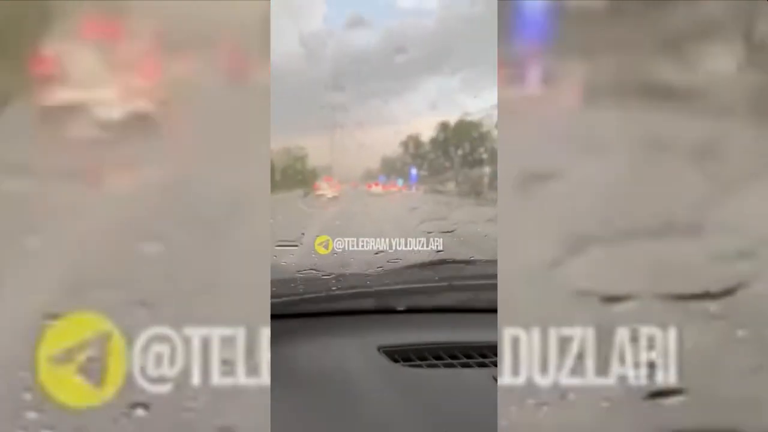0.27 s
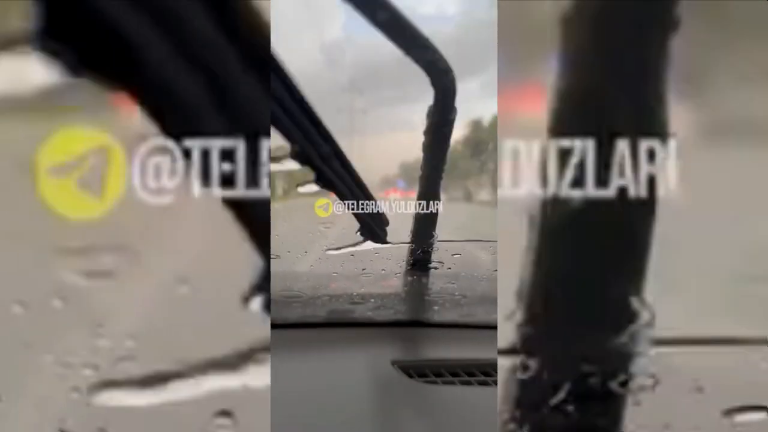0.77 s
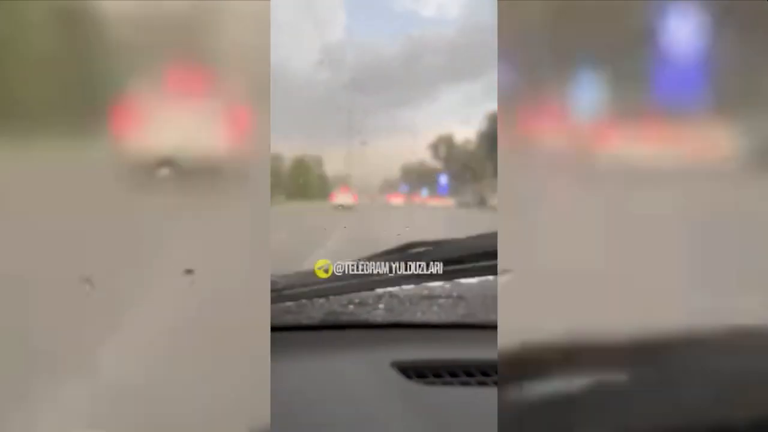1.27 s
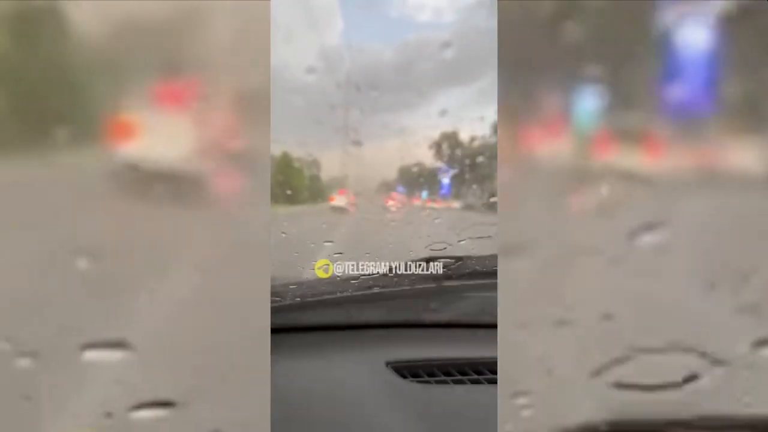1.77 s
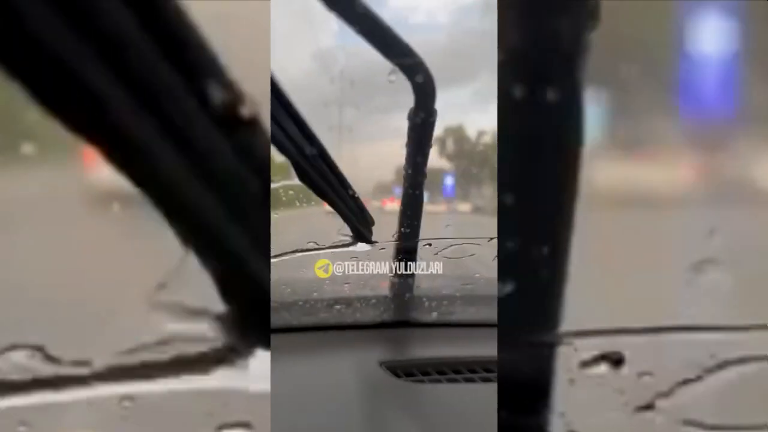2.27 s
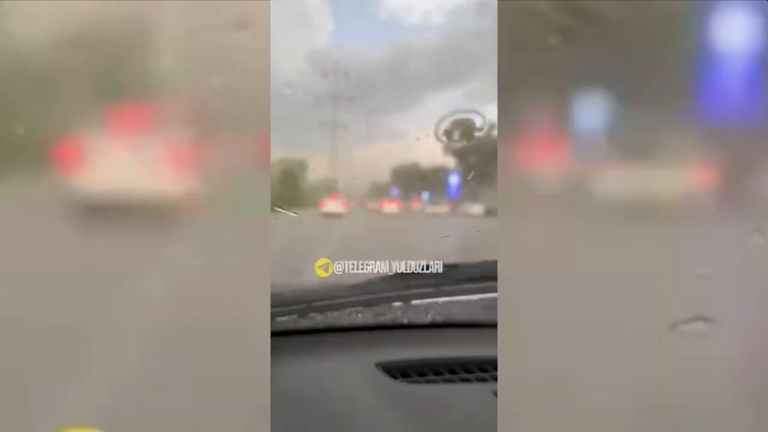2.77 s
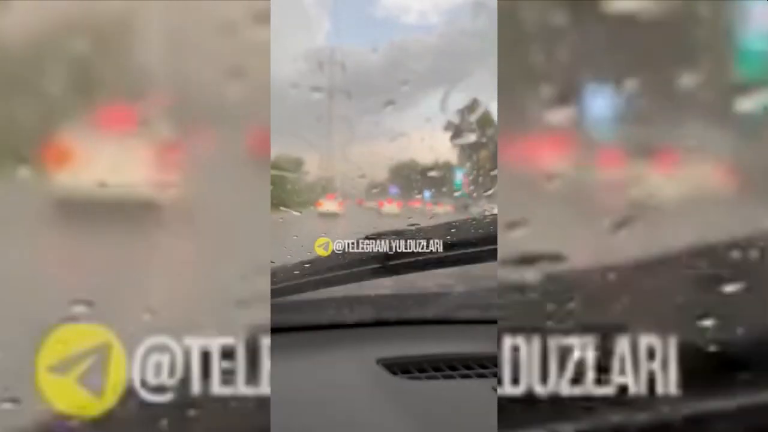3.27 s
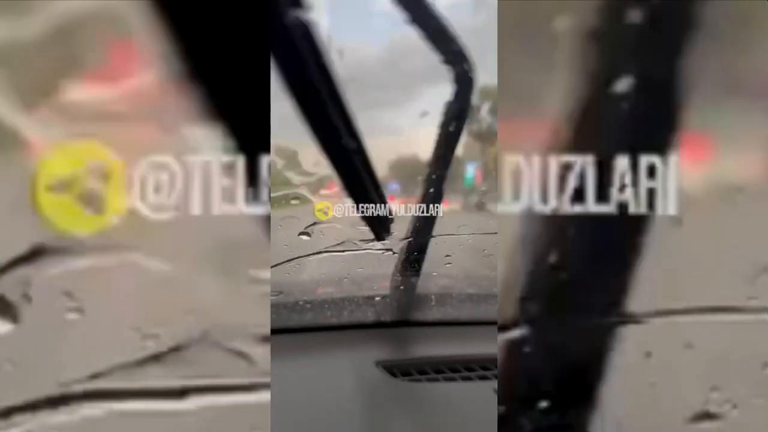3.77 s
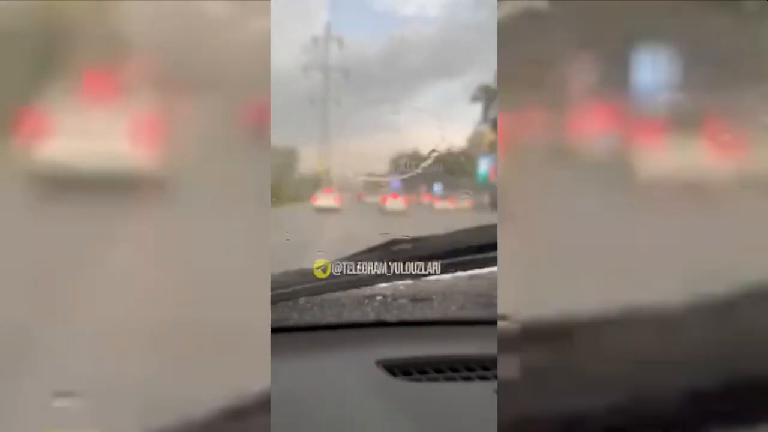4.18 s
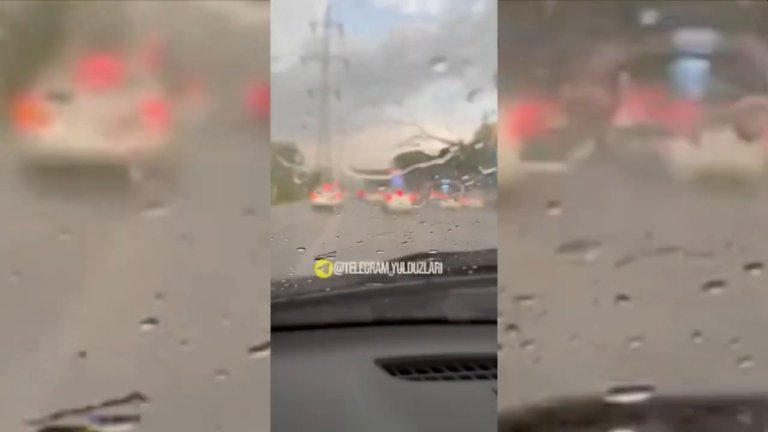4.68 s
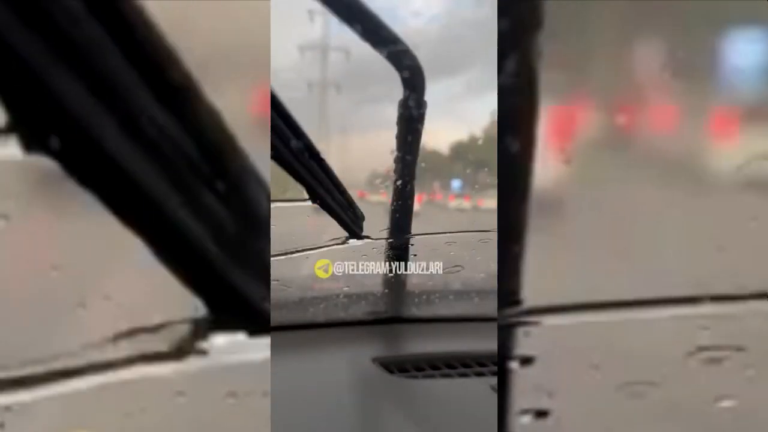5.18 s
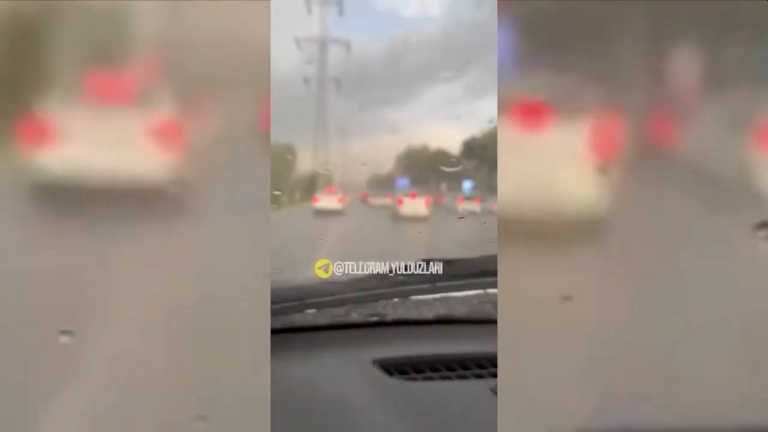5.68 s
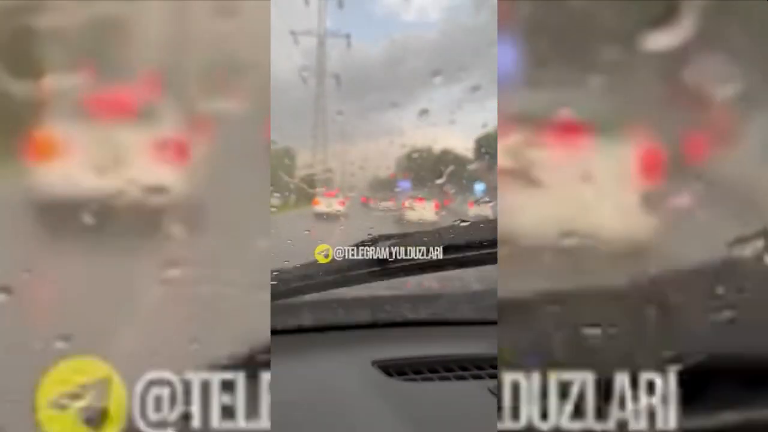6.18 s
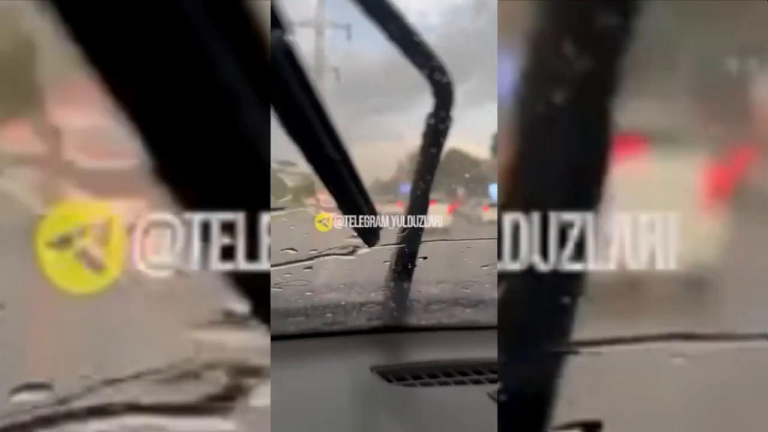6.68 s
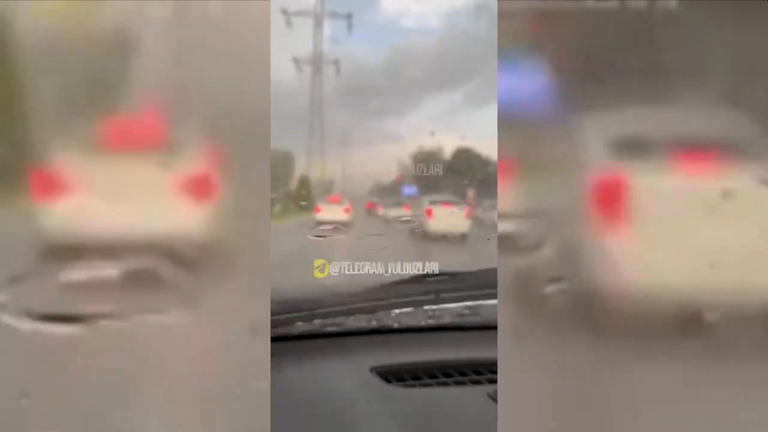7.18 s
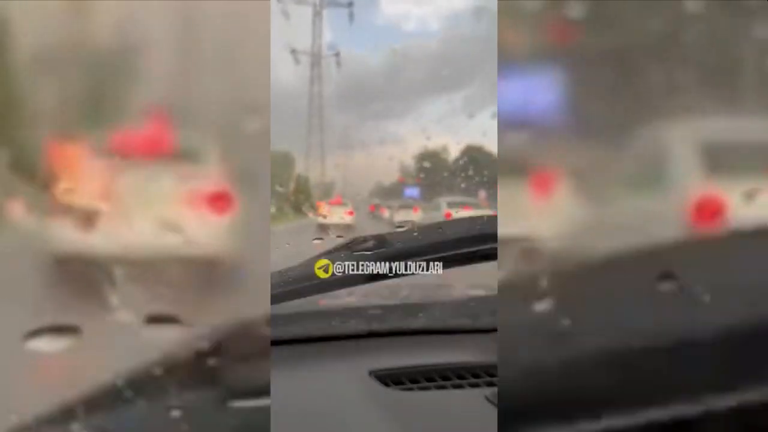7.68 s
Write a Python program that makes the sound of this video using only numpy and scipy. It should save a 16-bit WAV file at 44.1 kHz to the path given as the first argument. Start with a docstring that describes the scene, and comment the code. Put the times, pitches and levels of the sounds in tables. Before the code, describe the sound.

Inside a moving car in a downpour: dense pattering hiss, sharp drop cracks, low tyre rumble, bassy bumps and a wiper thud every second and a half.

```python
"""Inside a moving car in heavy rain, heard from the front seat.
Drops excite short bursts of damped modes: cracks on the windscreen, drumming through the roof lining, fine spray.
All come in flurries that slowly ease off. Wipers strike low modes of the bodywork and fling water aside.
Below, filtered noise makes the tyre rumble and body shake, and a wavering sine is the cabin air booming on bumps."""
import sys
import numpy as np
from scipy import signal
from scipy.fft import rfft, irfft, next_fast_len
from scipy.io import wavfile
from scipy.ndimage import uniform_filter1d

SR = 44100
rng = np.random.default_rng(int(sys.argv[2]) if len(sys.argv) > 2 else 0)


def dump_mix(stems):
    """Bounce the given channels to the path in sys.argv[1] as a 16-bit WAV at rate SR."""
    frames = np.atleast_2d(stems).T  # one column per channel
    limited = np.clip(frames, -1, 1)  # hard clip at full scale
    pcm = np.round(limited * 32767).astype(np.int16)
    wavfile.write(sys.argv[1], SR, pcm)


N = 349713
TIME = np.arange(N) / SR


def from_db(db):
    """Level and amplitude: 20 dB is a factor of ten."""
    return 10 ** (np.asarray(db) / 20)


def rms_one(x):
    """Normalisation: scale to unit rms."""
    return x / np.sqrt(np.mean(x ** 2) + 1e-20)


def steady(x, span_s):
    """Automatic gain: hold the running rms near one, leaving faster detail alone."""
    size = max(int(span_s * SR), 8)
    power = uniform_filter1d(uniform_filter1d(x ** 2, size), size)
    return x / np.sqrt(power + 1e-12)


def coloured(x, response):
    """Minimum-phase filtering: folding the cepstrum makes a given magnitude response causal."""
    size = 2 * next_fast_len(len(x) // 2 + 4096)
    hz, db = np.transpose(response)
    bins = np.maximum(np.arange(size // 2 + 1) * SR / size, 1)
    gain = from_db(np.interp(np.log(bins), np.log(hz), db))
    cepstrum = irfft(np.log(gain))
    cepstrum[1:size // 2] *= 2
    cepstrum[size // 2 + 1:] = 0
    return irfft(rfft(x, size) * np.exp(rfft(cepstrum)))[:len(x)]


def tinted(x, colour_db):
    """Modal individuality: give one spot of a panel a random colour of its own."""
    hz = np.geomspace(200, 9000, 24)
    db = colour_db * rng.uniform(-1.04, 1, len(hz))
    return coloured(x, np.column_stack([hz, db]))


CABIN_T60_S = 0.16


def impact(t60, cabin_db, rise_s):
    """High modal density: a struck panel is decaying noise, joined by the slower decay of the cabin."""
    t = TIME[:SR // 8]
    panel, cabin = rng.standard_normal((2, len(t))) * (1 - np.exp(-t / rise_s))
    panel = rms_one(panel * from_db(-60 * t / t60))
    cabin = rms_one(cabin * from_db(-60 * t / CABIN_T60_S))
    return rms_one(panel + from_db(cabin_db) * cabin)


BIGGEST_DROP = 3.2   # ceiling on the random drop size, in multiples of spread_db


def patter(per_s, spread_db, t60, cabin_db, colour_db, rise_s, count=48):
    """Poisson process: drops of random size strike random spots, each with its own ring and colour."""
    lead = SR // 8   # drops already ringing when the scene begins
    starts = np.flatnonzero(rng.random(lead + N) < per_s / SR)
    sizes = from_db(spread_db * np.minimum(rng.exponential(1, len(starts)), BIGGEST_DROP))
    spots = rng.integers(0, count, len(starts))
    rings = [tinted(impact(t60, cabin_db, rise_s), colour_db) for _ in range(count)]
    out = np.zeros(N + SR)
    for start, size, spot in zip(starts, sizes, spots):
        out[start:start + len(rings[spot])] += size * rings[spot]
    return rms_one(out[lead:lead + N])


def add(out, s, db, sound):
    """Superposition: mix in a sound starting at time s, scaled to a peak of db."""
    start = int(np.clip(s * SR, 0, N - 1))
    out[start:start + len(sound)] += (from_db(db) * sound / np.abs(sound).max())[:N - start]


def wander(corner_hz):
    """Low-passed noise: two equal one-pole filters give smooth chance with unit rms."""
    r = np.exp(-2 * np.pi * corner_hz / SR)
    noise = rng.standard_normal(N + SR)
    return rms_one(signal.lfilter([1], [1, -2 * r, r * r], noise)[SR:])


def swell(s, length_s, attack_s, release_s):
    """Envelope: straight ramps centred on start and end, reaching attack_s and release_s to each side."""
    rise = np.clip(.5 + (TIME - s) / (2 * attack_s), 0, 1)
    fall = np.clip(.5 + (s + length_s - TIME) / (2 * release_s), 0, 1)
    return np.minimum(rise, fall)


def curves(rows):
    """Linear interpolation: one curve in time for each column after the first."""
    s, *columns = np.transpose(rows)
    return [np.interp(TIME, s, c) for c in columns]


def tone(hz):
    """Phase accumulation: a sine of unit rms follows a pitch curve."""
    return np.sqrt(2) * np.sin(2 * np.pi * (np.cumsum(hz) / SR + rng.random()))


# The shower eases off in waves; flurries, brief clusters and splatters come on top.
# Each row: time in seconds, roof level in dB, windscreen level in dB, spray level in dB.
RAIN_LEVELS = [(0, -23, -24.5, -29), (.25, -26, -26, -32), (.75, -24.5, -23.5, -31),
               (1.15, -24.5, -25, -31), (1.6, -26, -26, -32.5), (2.4, -25, -26.5, -33.5),
               (2.8, -26.5, -27, -31.5), (3.3, -28.5, -27.5, -35.5), (3.85, -24, -27, -33),
               (4.15, -25.5, -30, -38), (5.1, -26, -29.5, -39.5), (5.55, -26, -30, -37.5),
               (6.25, -22.5, -27.5, -34.5), (6.55, -24.5, -31.5, -37.5), (6.95, -24.5, -31.5, -37),
               (7.45, -27.5, -33, -41), (7.93, -25.5, -32.5, -40.5)]
# Sheets of water slap the windscreen.
# Each row: start in seconds, length in seconds, lift of the spray in dB.
SPLATTERS = [(.01, 0.055, 5), (0.326, 0.12, 2), (0.616, 0.018, 3), (1.221, .06, 0), (1.783, 0.013, 4),
             (2, 0.033, 5.5), (2.133, 0.089, 3), (2.737, 0.032, 5), (2.832, 0.15, 2), (3.582, 0.044, -1),
             (3.694, 0.042, 5), (3.829, 0.11, 1.5), (4.183, 0.026, 3.5), (4.711, 0.047, 3),
             (5.453, 0.042, 2), (6.093, 0.052, 0), (6.365, 0.057, 2), (6.796, 0.11, 0.5)]
# Frequency responses of the windscreen, the fine spray and the lined roof.
# Each row: frequency in Hz, gain in dB.
GLASS_RESPONSE = [(300, -28.5), (800, -10.5), (1200, -5.5), (1550, -1.5), (1750, -4), (2050, -2), (2260, 1),
                  (2400, -1.9), (2540, 2), (2750, -2.5), (2950, -3.5), (3300, -7.5), (4000, -15),
                  (5000, -18), (9000, -37.5)]
SPRAY_RESPONSE = [(1500, -12), (3200, 1.5), (4250, 1.5), (4950, -4), (5800, 0.5), (7000, -3), (8300, -5.5),
                  (9000, -18)]
ROOF_RESPONSE = [(120, -16), (250, 0.5), (320, -4), (400, 0.5), (590, -1), (690, -4), (780, -3.5),
                 (970, -4.5), (1080, -7.5), (1300, -10.5), (2000, -19.5), (4000, -23.5), (9000, -46.5)]
FLURRY_CORNER_HZ, GLASS_FLURRY_DB, SPRAY_FLURRY_DB, ROOF_FLURRY_DB = 18, 0.98, 1, 0.97
CLUSTER_CORNER_HZ, CLUSTER_DB = 70, 0.6   # drops on the glass bunch into brief clusters
SPLATTER_EDGE_S, SPLATTER_GLASS_SHARE = 0.0084, 0.85   # the glass gets this share of the spray's lift
TICK_DB = -9   # lone drops right in front of the microphone, relative to the spray level


def rain():
    """Shared excitation: the same drops crack the glass and throw spray; others drum through the lining."""
    roof_db, glass_db, spray_db = curves(RAIN_LEVELS)
    flurry = wander(FLURRY_CORNER_HZ)
    cluster_db = CLUSTER_DB * wander(CLUSTER_CORNER_HZ)
    splatter_db = sum(db * swell(s, length_s, SPLATTER_EDGE_S, SPLATTER_EDGE_S)
                      for s, length_s, db in SPLATTERS)
    glass_gain = from_db(glass_db + SPLATTER_GLASS_SHARE * splatter_db + GLASS_FLURRY_DB * flurry + cluster_db)
    spray_gain = from_db(spray_db + splatter_db + SPRAY_FLURRY_DB * flurry + cluster_db)
    roof_gain = from_db(roof_db + ROOF_FLURRY_DB * wander(FLURRY_CORNER_HZ))

    on_glass = patter(per_s=850, spread_db=5.0, t60=0.014, cabin_db=0.5, colour_db=8.5, rise_s=0.0007)
    on_roof = patter(per_s=600, spread_db=3.0, t60=0.014, cabin_db=2.0, colour_db=5.5, rise_s=0.00077)
    droplets = patter(per_s=3300, spread_db=5.5, t60=0.0094, cabin_db=2.0, colour_db=8.5, rise_s=.0003)
    ticks = patter(per_s=130, spread_db=2.2, t60=0.004, cabin_db=-5.5, colour_db=3, rise_s=.0003)

    burst = on_glass + from_db(8.0) * droplets
    glass = from_db(-0.42) * glass_gain * steady(coloured(on_glass, GLASS_RESPONSE), 0.065)
    spray = from_db(0.04) * spray_gain * steady(coloured(burst, SPRAY_RESPONSE), 0.088)
    roof = roof_gain * steady(coloured(on_roof, ROOF_RESPONSE), 0.11)
    close = from_db(TICK_DB) * spray_gain * rms_one(coloured(ticks, SPRAY_RESPONSE))
    return glass + spray + roof + close


# Roughness of the road between big bumps, before the small jolts waver it.
# Each row: time in seconds, cabin boom in dB, body shake in dB, tyre rumble in dB.
ROAD_LEVELS = [(0, -27, -20.5, -20.5), (.4, -18, -17.5, -21.5), (.9, -29, -19.5, -21),
               (1.3, -28, -25.5, -24), (1.85, -24.5, -21.5, -21.5), (2.15, -27, -29, -22),
               (2.8, -25, -23.5, -21.5), (3.3, -20.5, -26, -20.5), (3.75, -22, -18.5, -21.5),
               (4.25, -20, -29, -21.5), (4.85, -20, -21, -22), (5.4, -34, -23, -21.5),
               (5.7, -24, -19.5, -20), (6.5, -17.5, -25, -22), (7.15, -22.5, -22.5, -24),
               (7.93, -17.5, -23.5, -21.5)]
# Big bumps in the road.
# Each row: start in seconds, length in seconds, cabin boom in dB, boom pitch in Hz.
BUMPS = [(0.065, 0.024, -8, 75), (0.113, 0.22, -9.5, 72.5), (0.18, 0.13, -4, 71), (0.403, 0.08, -7.5, 72.3),
         (0.615, 0.17, -8.5, 71.7), (0.819, 0.066, -14.5, 70.1), (1.012, 0.1, -11.5, 73),
         (1.131, 0.06, -13, 75.9), (1.834, 0.063, -16.5, 74.2), (2.07, 0.051, -14.5, 75.7),
         (2.171, 0.12, -18, 74), (2.33, 0.092, -17, 74.3), (2.51, 0.084, -15.5, 75.6),
         (2.685, .08, -17, 72.4), (2.958, 0.052, -19, 74.1), (3.036, 0.052, -17, 73.3),
         (3.138, 0.068, -12, 70.6), (3.42, 0.074, -16.5, 74.3), (3.544, 0.17, -13, 74.8),
         (3.846, 0.058, -12.5, 75.8), (3.964, 0.061, -10.5, 76), (4.415, 0.087, -13.5, 73.7),
         (4.598, 0.062, -12.5, 73.6), (4.834, 0.082, -15.5, 74.2), (4.96, 0.089, -15, 78.3),
         (5.225, 0.11, -7, 71.3), (5.393, 0.095, -14, 77), (5.937, 0.11, -9, 71.4),
         (6.428, 0.05, -12, 75.1), (6.513, 0.2, -12.5, 75.5), (6.95, 0.072, -11.5, 74.4),
         (7.241, 0.11, -12, 72.9), (7.477, 0.078, -12, 74.2), (7.594, 0.037, -7.5, 76.7)]
# The boom creeps up in pitch between bumps. Each row: time in seconds, mean pitch in Hz.
BOOM_PITCH = [(0, 72), (3, 72.63), (4.5, 76.57), (7.93, 77.86)]
BOOM_WAVER_HZ, PITCH_CORNER_HZ = 2.6, 8   # rms depth and speed of the pitch waver
JOLT_CORNER_HZ, JOLT_DB, BIGGEST_JOLT_DB = 11.6, 5, 5   # small jolts: speed, rms, ceiling on the lift
BUMP_ATTACK_S, BUMP_RELEASE_S = 0.012, 0.017


def cabin_boom():
    """Cavity resonance: the cabin air booms at a wavering pitch; each bump pulls it to a level and pitch."""
    boom_db, _, _ = curves(ROAD_LEVELS)
    hz = curves(BOOM_PITCH)[0] + BOOM_WAVER_HZ * wander(PITCH_CORNER_HZ)
    jolt_db = np.minimum(JOLT_DB * wander(JOLT_CORNER_HZ), BIGGEST_JOLT_DB)
    swing = from_db(boom_db + jolt_db)
    for s, length_s, db, bump_hz in BUMPS:
        bump = swell(s, length_s, BUMP_ATTACK_S, BUMP_RELEASE_S)
        swing = swing + bump * (from_db(db) - swing)
        hz = hz + bump * (bump_hz - hz)
    return swing * tone(hz)


def rolling_noise(response, span_s):
    """Random excitation: white noise through a resonant response, held at unit rms."""
    noise = rng.standard_normal(N + SR)
    return steady(coloured(noise, response)[SR:], span_s)


# Response of the shaking body. Each row: frequency in Hz, gain in dB.
SHAKE_RESPONSE = [(10, -35), (22, -25.5), (32, -18), (39, -4.5), (43, -1), (50, -9.5), (60, -7),
                  (90, -23.5), (200, -74)]
SWAY_DB = 1.7   # rms of the waver


def body_shake():
    """Forced vibration: noise around the low body resonance, wavering with small jolts."""
    _, shake_db, _ = curves(ROAD_LEVELS)
    gain = from_db(shake_db + SWAY_DB * wander(JOLT_CORNER_HZ))
    return gain * rolling_noise(SHAKE_RESPONSE, 0.1)


# Response of the rolling tyres. Each row: frequency in Hz, gain in dB.
TYRE_RESPONSE = [(20, -28), (60, -0.5), (105, 1), (135, -0.5), (175, -1.5), (220, -4.5), (290, -6.5),
                 (450, -19), (1000, -25), (4000, -77.5)]
TYRE_WAVER_DB = 1.5   # rms; the tyres roll unevenly


def tyre_rumble():
    """Rolling contact: the tread's random forcing becomes a low broadband rumble."""
    _, _, tyre_db = curves(ROAD_LEVELS)
    gain = from_db(tyre_db + TYRE_WAVER_DB * wander(JOLT_CORNER_HZ))
    return gain * rolling_noise(TYRE_RESPONSE, 0.17)


# The floor panels drone over the first rough stretch. Each row: time in seconds, level in dB.
DRONE_LEVELS = [(0, -23), (.25, -24.5), (.8, -25.5), (1.2, -44.5), (7.93, -40.5)]
# Resonance of the floor panels. Each row: frequency in Hz, gain in dB.
PANEL_RESPONSE = [(70, -39), (115, -1), (140, 6), (172, 2), (240, -41)]


def floor_drone():
    """Panel resonance: a narrow band of noise drones, then fades far down."""
    drone_db, = curves(DRONE_LEVELS)
    return from_db(drone_db) * rolling_noise(PANEL_RESPONSE, 0.064)


# Fat drops on the windscreen; the parts below are set relative to the reference level.
# Each row: start in seconds, reference level in dB, splash relative to it in dB before SPLASH_DB.
GLASS_HITS = [(0.015, -17, -6), (0.0477, -2, -15), (0.12, -13, -4), (0.159, -5, -27), (0.332, -5.5, -13),
              (0.36, -7.5, -20), (0.372, -7.5, -19), (0.539, -11, -31), (.632, -8, -28), (0.757, -14, -17),
              (0.831, -4, -20), (0.996, -12.5, -10), (1.06, -5, -20), (1.127, -7.5, -16),
              (1.296, -8.5, -23), (1.37, -10, -11), (1.39, -10, -14), (1.505, -11, -15), (1.554, -12, -30),
              (1.669, -4.5, -27), (1.783, -8, -24), (1.946, -8, -20), (2.037, -9.5, -6.5), (2.237, 1, -21),
              (2.2975, -8.5, -14), (2.312, -13, -9), (2.401, -7, -17), (2.428, -9, -24), (2.52, -6, -30),
              (2.595, -13.5, -5), (2.753, -8, -24), (2.854, -5, -14), (2.892, -17, -9), (2.958, -16.5, -20),
              (3.271, -17.5, -9), (3.3, -8, -29), (3.341, -10.5, -15), (3.373, -7, -39), (3.5744, -4, -18),
              (3.6291, -5.5, -17), (3.676, -13, -18), (3.718, -9, -15), (3.8182, -15.5, -3),
              (3.915, -20, -8), (4.098, -9, -34), (4.139, -9, -16), (4.177, -10, -24), (4.283, -9, -20),
              (4.4514, -6.5, -19), (4.488, -14.5, -12), (4.533, -11, -19), (4.613, -10, -26),
              (4.741, -15, -29), (4.986, -11, -24), (5.355, -15, -24), (5.4834, -5, -33), (5.577, -12, -27),
              (5.659, -10.5, -28), (5.806, -11.5, -23), (5.959, -9, -24), (6.111, -21, -6),
              (6.366, -14.5, -10), (6.407, -20.5, -4), (6.8044, -11, -11), (6.828, -12, -22),
              (6.8664, -10, -14), (6.906, -19, -24), (7.025, -14, -16), (7.129, -14, -25),
              (7.284, -10, -24), (7.323, -14, -27), (7.675, -12, -27), (7.701, -17, -29), (7.841, -12, -19)]
CRACK_DB, SPLASH_DB, KNOCK_DB = -5.5, 5, -13.5


def glass_hits():
    """Broadband impact: a crack, a splash and a dull knock, some short and some drawn out."""
    out = np.zeros(N)
    for s, db, splash_db in GLASS_HITS:
        stretch = from_db(rng.uniform(-4.1, 5))   # decay times are 0.62 to 1.78 times as long
        crack = tinted(impact(t60=0.018 * stretch, cabin_db=-8, rise_s=.0014), colour_db=4)
        splash = impact(t60=0.019 * stretch, cabin_db=-1.5, rise_s=0.003)
        knock = impact(t60=0.0051, cabin_db=-5.5, rise_s=0.00088)
        add(out, s, db + CRACK_DB, coloured(crack, GLASS_RESPONSE))
        add(out, s, db + splash_db + SPLASH_DB, coloured(splash, SPRAY_RESPONSE))
        add(out, s, db + KNOCK_DB, coloured(knock, ROOF_RESPONSE))
    return out


def body_ring(hz, t60, rise_s):
    """Damped oscillator: one low mode of the bodywork, softly struck."""
    t = TIME[:SR // 2]
    return tone(np.full(len(t), hz)) * (1 - np.exp(-t / rise_s)) * from_db(-60 * t / t60)


# The suspension thumps dully over seams in the road.
# Each row: start in seconds, peak level in dB, frequency in Hz.
THUMPS = [(0.231, -10, 119.5), (.715, -11, 135), (0.909, -11, 127), (1.554, -17.5, 148), (3.3, -17, 160.1),
          (4.295, -18, 181), (4.622, -15, 146.5), (5.676, -18.5, 129.5), (6.254, -19, 149.7)]


def suspension_thumps():
    """Impulse response: each seam excites one damped low mode."""
    out = np.zeros(N)
    for s, db, hz in THUMPS:
        add(out, s, db, body_ring(hz, t60=.25, rise_s=0.011))
    return out


# Response of a fat drop's tap through the lining. Each row: frequency in Hz, gain in dB.
TAP_RESPONSE = [(120, -16.5), (300, -1), (550, 2.5), (1000, -6), (1400, -14), (2000, -21.5), (4000, -23),
                (9000, -50)]
ROOF_RING_T60_S, OVERTONE_RATIO, OVERTONE_DB = 0.09, 2.5, -13.5


def roof_tap(hz, ring_db):
    """Plate modes: behind a dull tap, the struck spot rings at its note and an inharmonic overtone."""
    tap = coloured(impact(t60=0.035, cabin_db=-8, rise_s=.001), TAP_RESPONSE)
    t = TIME[:len(tap)]
    phase = 2 * np.pi * hz * t
    ring = np.sin(phase) + from_db(OVERTONE_DB) * np.sin(OVERTONE_RATIO * phase)
    ring = ring * from_db(-60 * t / ROOF_RING_T60_S)
    return rms_one(tap) + from_db(ring_db) * rms_one(ring)


# Fat drops on the roof, each spot with its own note.
# Each row: start in seconds, peak level in dB, ring in Hz, ring relative to the tap in dB.
ROOF_HITS = [(0.33, -14, 328, 5), (.494, -10, 497, -2), (.688, -12, 366, 8), (0.836, -14, 620, -4),
             (.904, -7, 387, 8), (.94, -12, 418, 0), (1.393, -14, 504, 7), (1.624, -12, 470, -2),
             (2.944, -12, 445, 1), (3.833, -15, 380, 5), (3.863, -16, 445, 13), (4.377, -14, 316, 0),
             (4.452, -11.5, 468, 6), (4.779, -12.5, 400, -1.5), (5.21, -14, 594, -2),
             (5.429, -11, 570, -11), (5.726, -13.5, 463, 3), (5.902, -10, 385, 9), (5.98, -9.5, 518, 0),
             (6.36, -13.5, 598, 3), (6.476, -7, 542, 0), (6.88, -14, 554, 6), (7.664, -14, 528.6, 2),
             (7.753, -10.5, 573, 1), (7.846, -15, 600, -12)]


def roof_hits():
    """Local excitation: each heavy drop sounds the note of the spot it strikes."""
    out = np.zeros(N)
    for s, db, hz, ring_db in ROOF_HITS:
        add(out, s, db, roof_tap(hz, ring_db))
    return out


# The bodywork under the wipers.
# Each row: mode in Hz, mean level in dB, decay time (T60) in seconds.
BODY_MODES = [(112, 0.5, 0.21), (148, 5.5, 0.16), (186.3, -2.5, 0.29)]


def thud():
    """Modal superposition: all body modes at once, their levels a little different at each blow."""
    return sum(from_db(db + rng.normal(0, 2.0)) * body_ring(hz, t60, rise_s=0.0078)
               for hz, db, t60 in BODY_MODES)


# Wipers turning at the top of their sweep.
# Each row: time in seconds, thud peak in dB, clatter peak in dB, flung water in dB, water on the return in dB.
WIPER_TURNS = [(0.867, -8, -14, -29, -30), (2.308, -8.5, -19, -46, -29.5), (3.757, -8, -18, -40, -35),
               (5.205, -13, -15, -27, -25), (6.66, -8.5, -14, -35, -52)]
# Response of the clattering wiper arms. Each row: frequency in Hz, gain in dB.
CLATTER_RESPONSE = [(60, -14), (130, -3), (400, 1), (1200, -26), (5000, -65)]
FLIP_LEAD_S, FLIP_DB = .022, -4.5   # the rubber flips softly just before the arm stops
FLING_DELAY_S, FLING_S, FLING_FADE_S = 0.034, 0.09, 0.018   # water leaves the blade just after the turn
RETURN_S = 0.665   # from the top of the sweep back to the foot of the screen


def wipers():
    """Momentum transfer: the turning blades thud through the bodywork and fling water at both ends."""
    out = np.zeros(N)
    gobs = patter(per_s=350, spread_db=-1.5, t60=0.022, cabin_db=-4, colour_db=-1.5, rise_s=0.00055, count=8)
    water = steady(coloured(gobs, ROOF_RESPONSE), 0.11)
    for s, thud_db, clatter_db, flung_db, return_db in WIPER_TURNS:
        clatter = impact(t60=0.13, cabin_db=-5.5, rise_s=0.0084)
        add(out, s - FLIP_LEAD_S, thud_db + FLIP_DB, thud())
        add(out, s, thud_db, thud())
        add(out, s, clatter_db, coloured(clatter, CLATTER_RESPONSE))
        for delay_s, db in [(FLING_DELAY_S, flung_db), (RETURN_S, return_db)]:
            out += from_db(db) * water * swell(s + delay_s, FLING_S, FLING_FADE_S, FLING_FADE_S)
    return out


def scene():
    """Superposition: all pressures add at one microphone behind the windscreen."""
    road = cabin_boom() + body_shake() + tyre_rumble() + floor_drone() + suspension_thumps()
    return (rain() + road + glass_hits() + roof_hits() + wipers())[None]


MICROPHONE_TOP_HZ, CUTOFF_HZ = 8850, 15800   # low-pass before the limiter, and after the clipping
LIMIT_DB, LIMITER_RECOVERY_DB_PER_S = 0.5, 54


def low_pass(x, top_hz):
    """Elliptic filtering: a steep edge removes the treble above top_hz."""
    return signal.sosfilt(signal.ellip(9, .1, 80, top_hz, fs=SR, output="sos"), x)


def record(dry):
    """Nonlinear transfer: the treble is lost, a limiter ducks loud peaks, and remaining crests clip."""
    heard = low_pass(dry, MICROPHONE_TOP_HZ)
    over_db = np.maximum(20 * np.log10(np.abs(heard) + 1e-9) - LIMIT_DB, 0)
    # a running maximum against a rising ramp gives a duck that recovers at a steady rate
    recovery_db = LIMITER_RECOVERY_DB_PER_S * TIME
    duck_db = np.maximum.accumulate(over_db + recovery_db, axis=-1) - recovery_db
    held = heard * from_db(-uniform_filter1d(duck_db, size=512))
    return low_pass(np.clip(held, -.98, .98), CUTOFF_HZ)


dry = scene()
out = record(dry)
dump_mix(out)
```